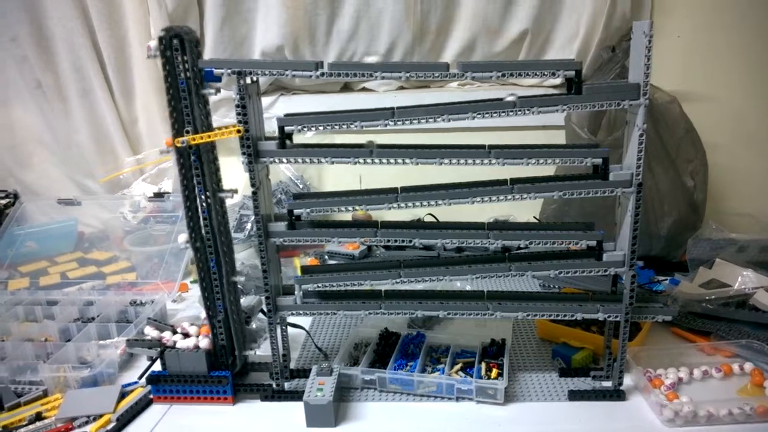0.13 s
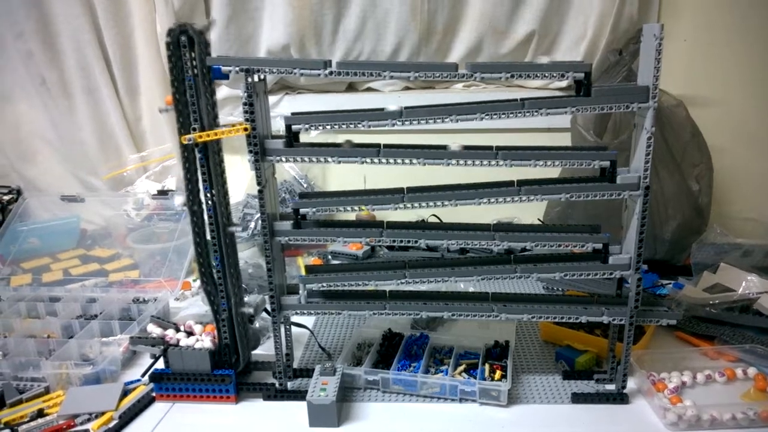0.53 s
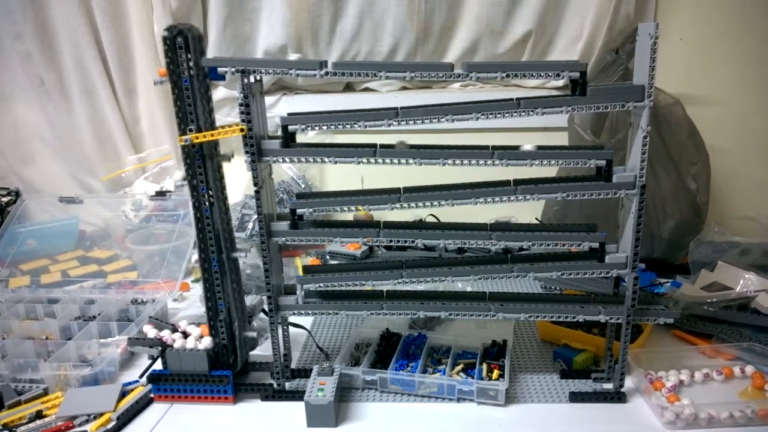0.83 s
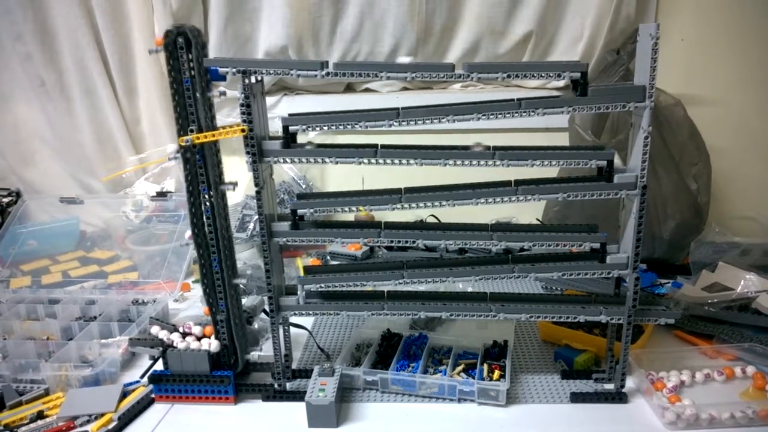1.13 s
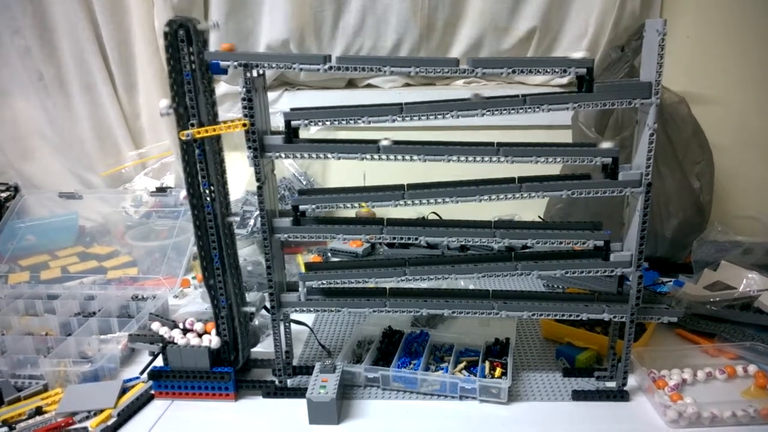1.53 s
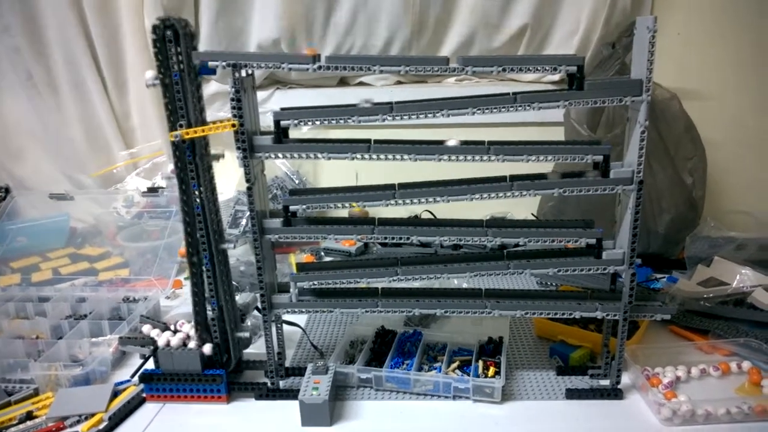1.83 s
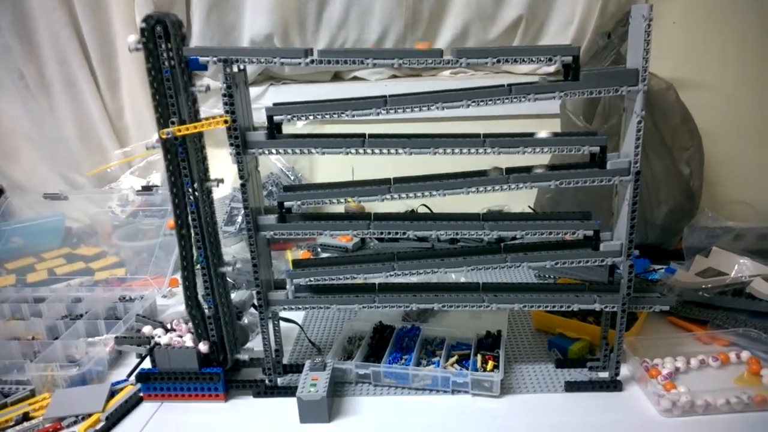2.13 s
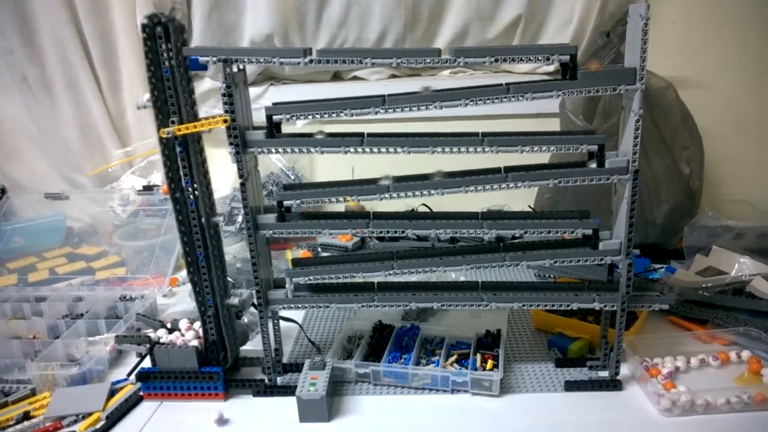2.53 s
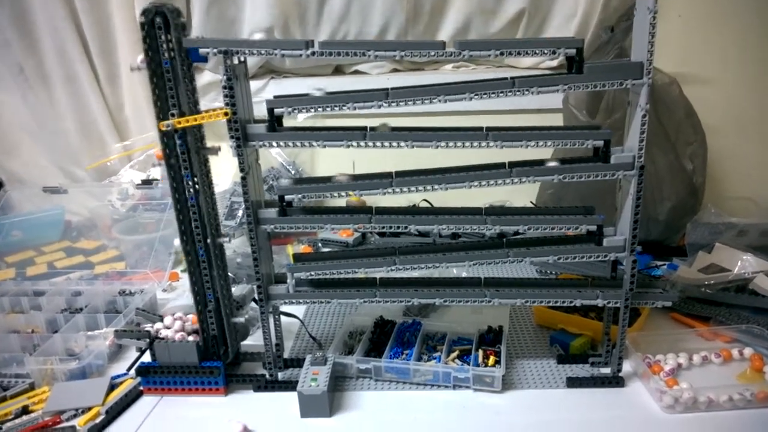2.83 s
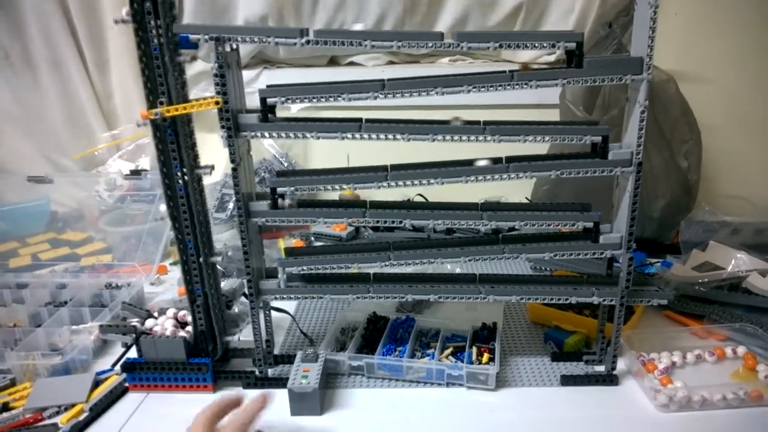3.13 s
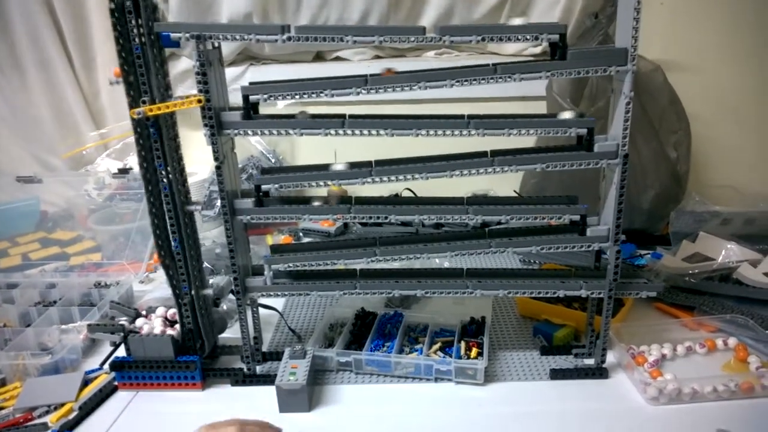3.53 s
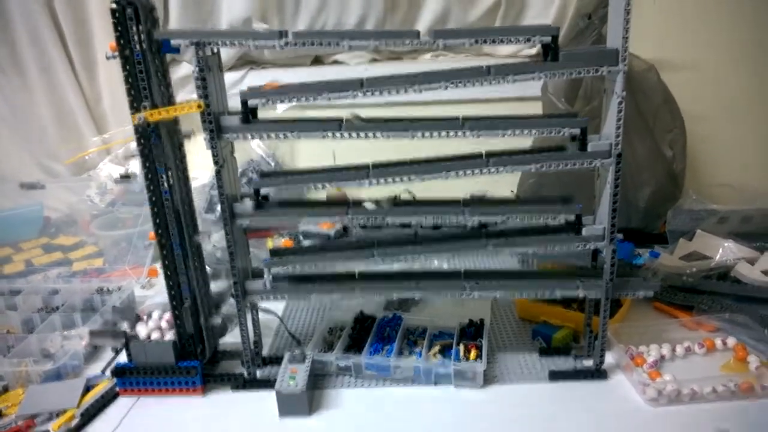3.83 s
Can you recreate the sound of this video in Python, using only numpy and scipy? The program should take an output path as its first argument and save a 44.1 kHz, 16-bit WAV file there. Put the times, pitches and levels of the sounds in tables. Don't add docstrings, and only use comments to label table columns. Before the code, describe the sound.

Small hard plastic balls clack and rattle down zigzag beam ramps over a soft motor whirr.

```python
import sys
import numpy as np
from scipy import signal
from scipy.fft import rfft, irfft, next_fast_len
from scipy.io import wavfile
from scipy.ndimage import uniform_filter1d, map_coordinates

SR = 44100
rng = np.random.default_rng(int(sys.argv[2]) if len(sys.argv) > 2 else 0)


def ratio(d):
    e = np.asarray(d, float) / 20
    return 10 ** e


def int16_out(signal):
    q = np.round(np.clip(np.atleast_2d(signal).T, -1, 1) * 32767)
    wavfile.write(sys.argv[1], SR, q.astype(np.int16))


N = 176400


def unit(x):
    return x / np.sqrt(np.mean(x ** 2) + 1e-20)


def noise(size=N):
    return rng.standard_normal(size)


def wobble(rate_hz, size=N):
    knots = noise(int(size * rate_hz / SR) + 4)
    return map_coordinates(knots, [np.arange(size) * rate_hz / SR])


def decay(t, t60_s):
    return ratio(-60 * t / t60_s)


def rise(t, rise_s):
    return 1 - np.exp(-t / rise_s)


def blow(db, size):
    return ratio(db) * (np.arange(size) == 0)


def swells(rows):
    t = np.arange(N) / SR
    return sum(ratio(db) * np.exp(-2 * (2 * (t - s) / length) ** 2) for s, length, db in rows)


def add_at(out, start_s, sound):
    out[round(start_s * SR):][:len(sound)] += sound


def modes(table, hz):
    total = 0
    for k, (centre, width, db) in enumerate(table):
        loss = 1j * hz * width
        total = total + (-1) ** k * ratio(db) * loss / (centre ** 2 - hz ** 2 + loss)
    return total


def filtered(x, response):
    m = next_fast_len(len(x) + SR // 8)
    return irfft(rfft(x, m) * response(np.fft.rfftfreq(m, 1 / SR)), m)[:len(x)]


def dulled(x, top_hz):
    return filtered(x, lambda hz: 1 / (1 + (hz / top_hz) ** 6))


def ring(table, shape, push=0):
    detune, scatter_db, rattle_db, rattles_per_s = 0.01, 2, 11, 300
    luck = noise((len(table), 2))
    body = [(f * (1 + detune * a), w, db + scatter_db * b) for (f, w, db), (a, b) in zip(table, luck)]
    norm = np.sqrt(np.mean(np.abs(modes(body, np.linspace(1, SR / 2, num=2048))) ** 2))
    rattles = ratio(rattle_db * (rng.random(len(shape)) < rattles_per_s / SR))
    drive = shape * rattles * noise(len(shape)) + push
    return filtered(drive, lambda hz: modes(body, hz)) / norm


# f/Hz, width/Hz, level/dB
CLICK_MODES = [(2610, 390, -8.5), (3375, 142, -1), (3625, 87, 3.5), (4140, 121, 4), (5120, 181, 1),
               (6440, 580, -6.5), (7240, 1100, -8), (8690, 550, -7.5), (9890, 260, -6), (11730, 1300, -11),
               (13000, 3000, -28.5)]
# f/Hz, width/Hz, level/dB
SHELL_MODES = [(4180, 4500, -2), (9600, 1600, -3), (13300, 11000, -7.5)]


def click(t, crack_db, damp, chatter, onset, top_hz):
    crack = ratio(crack_db) * decay(t, 0.017)
    tail = ratio(-3) * crack + chatter * ratio(-8) * decay(t, 0.24 / damp)
    beam = ring(CLICK_MODES, onset * tail, onset * blow(crack_db - 3, len(t)))
    sizzle = ratio(-20.5) * crack + ratio(-11.5) * decay(t, 0.25 / damp)
    shell = ring(SHELL_MODES, onset * sizzle)
    return dulled(beam + shell, top_hz)


def body_ring(table, t, db, t60_s, rise_s, onset, trim_db=0, chatter=1):
    swell = chatter * ratio(db + trim_db) * decay(t, t60_s) * rise(t, rise_s)
    return ring(table, swell, onset * blow(db + 16.5, len(t)))


# t/s, peak/dB, thump/dB, frame ring/dB, crack/dB
STOP_HITS = [
    (0.115, -19.5, -17, -5, 4.5),
    (0.763, -23, -2, 3.5, -7),
    (0.952, -17.5, -17, -7, 5.5),
    (2.203, -16, -13.5, -6, -1),
    (2.437, -15, -15, -4, 1),
    (2.532, -20.5, -8, 2.5, -1),
    (2.989, -18, -13, -1.5, -1),
    (3.09, -20, -19, -10, 4.5),
    (3.892, -15.5, -10.5, -7, 2),
]
RAMP_DROPS = [(0.1317, -13, -19, -1.5, 5.5), (0.7803, -12, -12.5, -5, 3.5), (0.971, -12.5, -31, -2.5, 6.5),
              (1.256, -9.5, -24, -6.5, 2.5), (1.704, -8.5, -15, -6, 6.5), (2.222, -13.5, -33, -3.5, 9.5),
              (2.457, -9, -26.5, -8, 7), (2.627, -10.5, -13, -6.5, -1.5), (3.004, -13.5, -17, -0.5, 8.5),
              (3.106, -11.5, -21, -3.5, 5.5), (3.155, -13, -17, -1.5, 7.5), (3.751, -9.5, -22, -6, 7.5),
              (3.776, -14.5, -16, -5.5, 9), (3.909, -15, -19.5, -2, 12.5)]
REBOUNDS = [(0.157, -28, -12, 3, -4), (0.202, -20.5, -29, -5.5, 4), (0.236, -25.5, -17, -4, 0),
            (0.846, -14.5, -23, -7, 1.5), (0.903, -39.5, -18, 12, 1), (1.0266, -20.5, -22, -8, 0),
            (1.333, -22, -28, -1, 7), (1.783, -15.5, -22, -5, 7), (1.819, -20, -24, -6, -10),
            (1.900, -29, -12.5, -15, 7), (2.275, -18.5, -24, -7, -4), (2.687, -11.5, -18.5, -8.5, -15),
            (2.739, -20.5, -16, -2.5, 0), (3.063, -25, -27, -10, 10), (3.015, -26, -24, 4, 1),
            (3.1368, -26, -12, -8, 10), (3.2143, -27.5, -27, -8, 14.5), (3.2425, -32, -31, -19, 17.5),
            (3.8357, -17.5, -16, -3.5, 2), (3.8405, -15.5, -28, -5.5, 3.5), (3.968, -24, -19, -9, 10.5)]
BIN_HITS = [
    (0.641, -12.5, -15, -12, 5),
    (0.698, -21, -22, -5.5, 8),
    (1.5933, -11.5, -17, -12.5, 4),
    (1.653, -17.5, -36, -13.5, -14),
    (2.17, -19, -12.5, -7, 5),
    (3.627, -11, -17, -11, -7),
    (3.688, -19, -27, -8.5, 1),
]
# f/Hz, width/Hz, level/dB
FRAME_MODES = [(954, 79, -6), (993, 92, -0.5), (1152, 58, 0), (1309, 110, -5), (1464, 120, -4.5),
               (1639, 24, 5), (1796, 130, -2), (1892, 178, -3), (2260, 210, -7), (3000, 610, -10)]
TABLE_MODES = [(482, 106, -1.5), (580, 46, 3.5), (644.6, 33, 8.5), (803, 75, 1)]
BIN_MODES = [(145, 24, -9), (212, 40, -5), (307, 170, -4.5), (447, 82, -1), (680, 230, -8)]


def contacts():
    out, t = np.zeros(N + SR), np.arange(SR // 3) / SR
    soft = rise(t, 0.003)
    stop_damp, soft_top_hz, bin_top_hz = 2.2, 15000, 11300
    kinds = [(STOP_HITS, stop_damp, FRAME_MODES[4:], TABLE_MODES, 1, soft_top_hz),
             (RAMP_DROPS, 1, FRAME_MODES, TABLE_MODES, 1, SR),
             (REBOUNDS, 1, FRAME_MODES, TABLE_MODES, 1, soft_top_hz),
             (BIN_HITS, 1, FRAME_MODES[3:], BIN_MODES, soft, bin_top_hz)]
    for rows, damp, beams, base, onset, top_hz in kinds:
        for s, db, thump_db, frame_db, crack_db in rows:
            chatter = ratio(3 * np.clip(wobble(355, len(t)), -2, 2))
            bright = click(t, crack_db, damp, chatter, onset, top_hz)
            frame = body_ring(beams, t, frame_db, 0.27 / damp, 0.002, onset, chatter=chatter)
            thump = body_ring(base, t, thump_db, 0.38 / damp, 0.0026, onset, trim_db=1)
            add_at(out, s, ratio(db - 12) * (bright + frame + thump))
    return out[:N]


# t/s, peak/dB
STRAY_HITS = [
    (2.555, -3.5),
    (2.576, -16),
    (2.603, -19),
    (2.641, -12),
    (2.696, -14.5),
    (2.701, -22),
    (2.717, -25),
    (2.728, -23),
    (2.743, -26),
    (2.755, -30),
]
# f/Hz, width/Hz, level/dB
TRAY_MODES = [(288, 98, -4), (610, 420, -3), (1100, 530, 0.5), (2140, 1500, -0.5), (3260, 760, 1.5),
              (5100, 960, -6.5), (9000, 4200, -14.5)]


def stray():
    out, t = np.zeros(N + SR), np.arange(SR // 3) / SR
    for s, db in STRAY_HITS:
        tail = ratio(-9.5 + 3 * wobble(355, len(t))) * decay(t, 0.17)
        shape = decay(t, 0.017) + tail
        add_at(out, s, ratio(db - 10) * ring(TRAY_MODES, shape, blow(5, len(t))))
    return out[:N]


# t/s, level/dB
JOINT_TICKS = [(.049, -44.5), (2.304, -37), (2.791, -39), (2.929, -44), (3.372, -47), (3.392, -49),
               (3.406, -41), (3.421, -42), (3.432, -42), (3.448, -42), (3.458, -43), (3.466, -40.5)]
# f/Hz, width/Hz, level/dB
JOINT_MODES = [(1710, 240, 2), (2520, 280, -2.5), (3230, 320, -2.5), (4170, 280, -9)]


def joints():
    out, t = np.zeros(N + SR), np.arange(SR // 8) / SR
    for s, db in JOINT_TICKS:
        add_at(out, s, ring(JOINT_MODES, ratio(db) * decay(t, 0.058)))
    return out[:N]


# middle/s, length/s, level/dB
ROLL_PASSES = [
    (0.05, 0.23, -51),
    (0.387, 0.054, -50),
    (0.53, 0.15, -50.5),
    (1.12, 0.13, -49),
    (1.953, 0.16, -56.5),
    (2.164, 0.17, -45.5),
    (2.84, 0.44, -54.5),
    (3.439, 0.28, -61),
]


def rolling():
    floor_db, grains_per_s, spread_db = -64, 2500, 6
    level = ratio(floor_db) + swells(ROLL_PASSES)
    size = ratio(spread_db * np.minimum(rng.exponential(size=N), 2))
    knocks = (rng.random(N) < grains_per_s / SR) * noise() * size
    body = lambda hz: modes(FRAME_MODES[2:], hz) + ratio(-3.5) * modes(CLICK_MODES[:5], hz)
    return level * unit(filtered(knocks, body))


# t/s, level/dB, f/Hz, t60/s
LINK_PINGS = [
    (2.086, -30, 3620, 0.026),
    (2.173, -12, 2120, 0.012),
    (2.437, -17, 2400, 0.016),
    (2.438, -23.5, 3720, 0.042),
    (2.997, -20, 2120, 0.03),
    (.905, -27.5, 3790, 0.032),
    (1.902, -39, 3750, .08),
]
# start/s, length/s, from/Hz, to/Hz, level/dB
LINK_CREAKS = [
    (2.134, 0.042, 1880, 2130, -47),
    (2.91, 0.068, 1894, 2600, -48),
]


def links():
    out, t = np.zeros(N + SR), np.arange(SR // 8) / SR
    for s, db, hz, t60_s in LINK_PINGS:
        add_at(out, s, ratio(db) * decay(t, t60_s) * rise(t, 0.0011) * np.sin(2 * np.pi * hz * t))
    for s, length, from_hz, to_hz, db in LINK_CREAKS:
        u = np.clip(t / length, 0, 1)
        pitch_hz = (from_hz + (to_hz - from_hz) * u) * (1 + 0.1 * wobble(388, len(t)))
        level = ratio(db + 3.7 * wobble(217, len(t))) * np.abs(np.sin(np.pi * u))
        add_at(out, s, level * np.sin(2 * np.pi * np.cumsum(pitch_hz) / SR))
    return out[:N]


# middle/s, length/s, level/dB
CHAIN_BRUSHES = [
    (.5, 0.056, -68),
    (1.97, 0.14, -60),
    (2.06, 0.055, -58),
    (2.13, 0.11, -59),
    (2.86, .08, -57),
]


def brushes():
    colour = lambda hz: modes(SHELL_MODES[1:], hz) ** 2 / (1 + (hz / 15000) ** 10)
    return swells(CHAIN_BRUSHES) * unit(filtered(noise(), colour))


# f/Hz, width/Hz, level/dB
GEAR_MODES = [(760, 28, -6), (1180, 190, -4.5), (1655, 27, 6), (1946, 230, 0.5), (2400, 850, -4),
              (3370, 280, -5.5), (3890, 130, -3.5), (4380, 300, -6), (5120, 247, -0.5), (8030, 710, -7.5),
              (9940, 1270, -10)]


def motor():
    mesh_hz = 73.4 * (1 + 0.024 * wobble(1.9))
    mesh_db = 0.5 * np.sin(2 * np.pi * np.cumsum(mesh_hz) / SR)
    return ratio(-49) * unit(filtered(noise() * ratio(mesh_db), lambda hz: modes(GEAR_MODES, hz)))


def patchy(x):
    z = signal.stft(x, nperseg=512)[2]
    field = uniform_filter1d(noise(z.shape), size=8, axis=0)
    field = uniform_filter1d(field, size=12, axis=1)
    return signal.istft(z * ratio(1.8 * unit(field)), nperseg=512)[1][:N]


# f/Hz, width/Hz, level/dB
HUM_MODES = [(75, 24, -2.5), (153.6, 7.6, 1.5)]


def hum():
    return ratio(-67) * unit(filtered(noise(), lambda hz: modes(HUM_MODES, hz) ** 2))


# f/Hz, width/Hz, level/dB
LEG_MODES = [(70.5, 33, -4), (153.3, 21.2, -1.5), (213.8, 24.2, -1.5), (283.5, 25.6, 1.5),
             (382, 65.5, -1.5)]
# middle/s, length/s, level/dB
ROLL_RUMBLES = [
    (.05, 0.24, -56.5),
    (.38, 0.22, -57.5),
    (1.97, 0.17, -53.5),
    (2.2, .12, -52),
    (2.75, 0.2, -53),
    (3.18, 0.051, -53),
    (3.85, 0.073, -64),
]


def legs(hits):
    fading = decay(np.arange(SR // 2) / SR, 0.39)
    shaking = signal.fftconvolve(np.abs(hits), fading / fading.sum())[:N]
    boom = unit(filtered(noise(), lambda hz: modes(LEG_MODES, hz) ** 2))
    return (ratio(-18.5) * shaking + swells(ROLL_RUMBLES)) * boom


def room(x):
    out, t, span = np.zeros(N + SR), np.arange(SR // 3) / SR, round(SR / 4)
    for start in range(0, N, span):
        tail = noise(len(t)) * decay(t, 0.48) * (t > 0.006)
        tail = filtered(tail / np.linalg.norm(tail), lambda hz: 1 / (1 + 1j * hz / 9600) ** 2)
        echo = signal.fftconvolve(x[start:start + span], tail)
        out[start:][:len(echo)] += echo
    return ratio(-7) * out[:N]


# f/Hz, level/dB per Hz
AIR_SPECTRUM = [(12, -45), (20, -1), (70, -2), (607, -0.5), (759, 2), (1480, -6), (1660, -6.5), (9400, -30),
                (16000, -35)]


def air():
    f, db = np.transpose(AIR_SPECTRUM)
    colour = lambda hz: ratio(np.interp(np.log(hz + 1), np.log(f + 1), db))
    return ratio(-55.5 + 0.68 * wobble(3.1)) * unit(filtered(noise(), colour))


def scene():
    hits = contacts() + stray() + links() + joints()
    steady = dulled(patchy(rolling() + motor()) + hum() + air(), 13000)
    return (hits + room(hits) + legs(hits) + brushes() + steady)[None]


def top_cut(x):
    return signal.sosfilt(signal.butter(12, 16820, fs=SR, output="sos"), x)


def record(dry):
    clip_top, top_hz = 0.5, 15850
    soft = dry[0] / (1 + (dry[0] / clip_top) ** 4) ** (1 / 4)
    edge = lambda hz: ratio(-38 / (1 + np.exp(np.clip((top_hz - hz) / 40, -50, 50))))
    return top_cut(filtered(soft, edge)[None])


dry = scene()
out = record(dry)
int16_out(out)
```